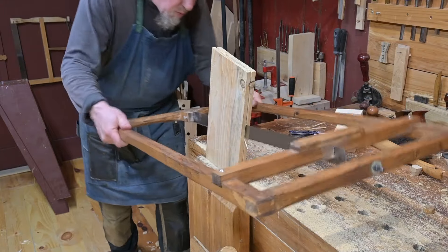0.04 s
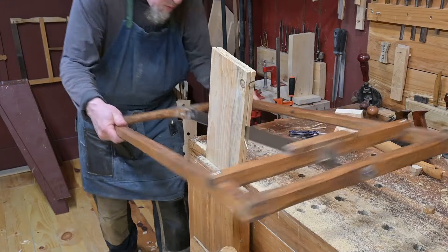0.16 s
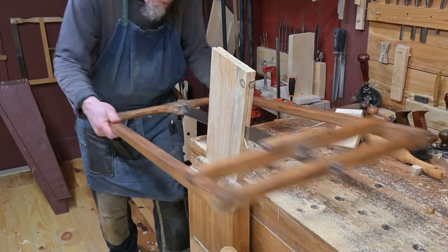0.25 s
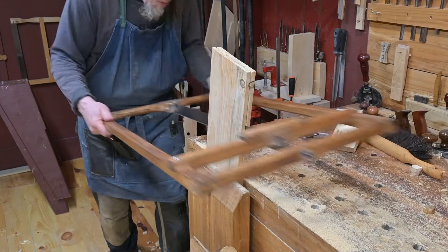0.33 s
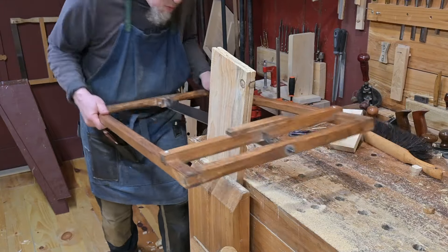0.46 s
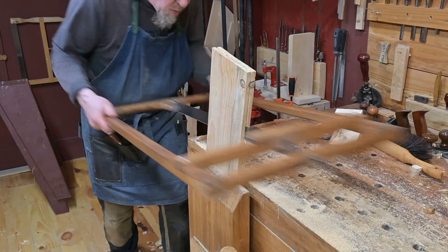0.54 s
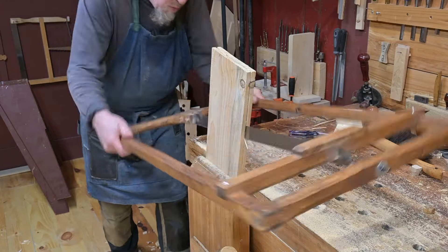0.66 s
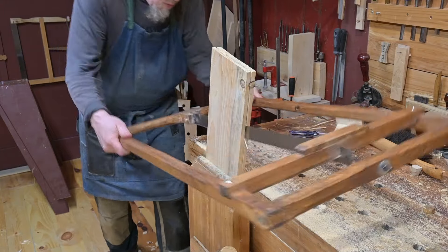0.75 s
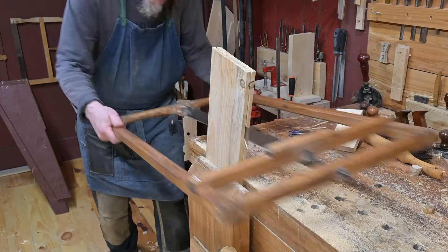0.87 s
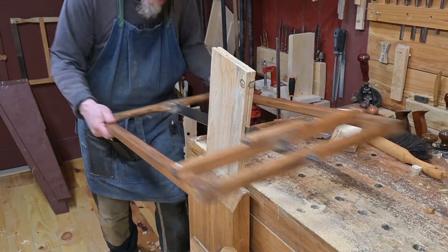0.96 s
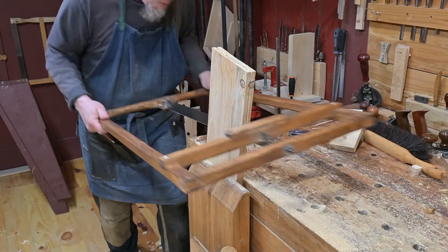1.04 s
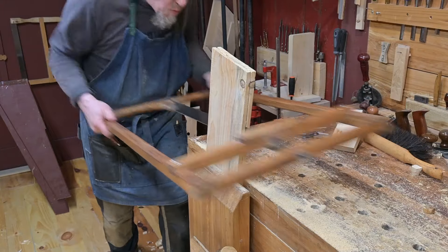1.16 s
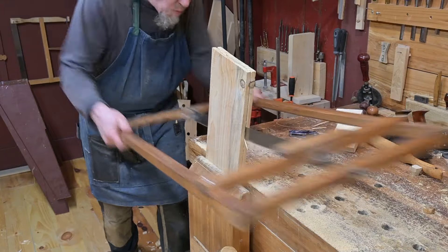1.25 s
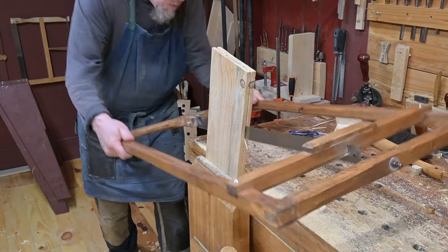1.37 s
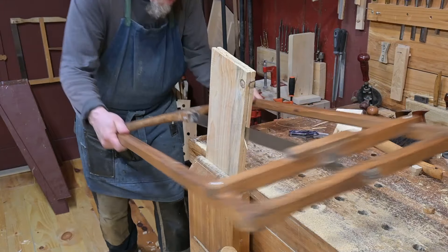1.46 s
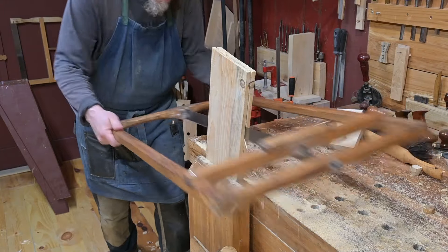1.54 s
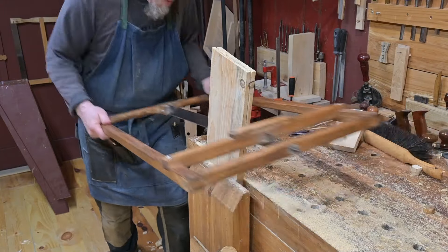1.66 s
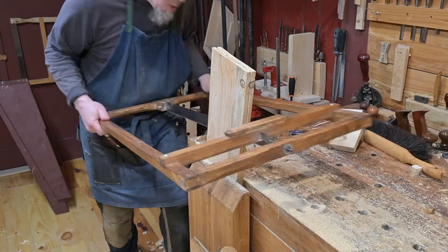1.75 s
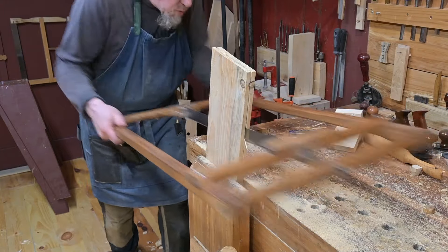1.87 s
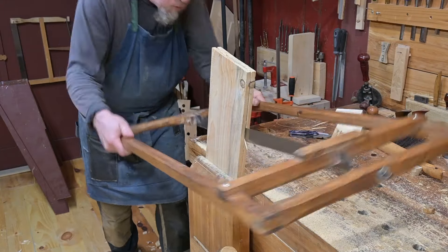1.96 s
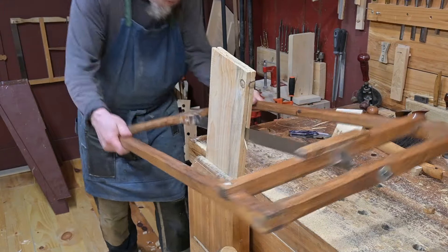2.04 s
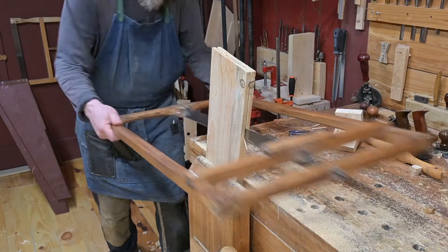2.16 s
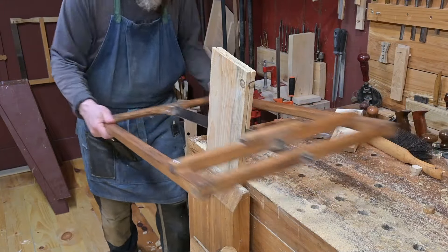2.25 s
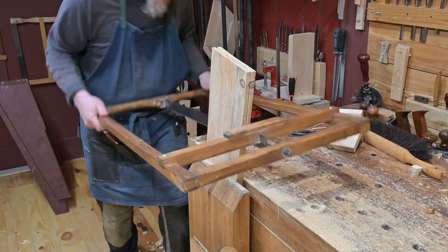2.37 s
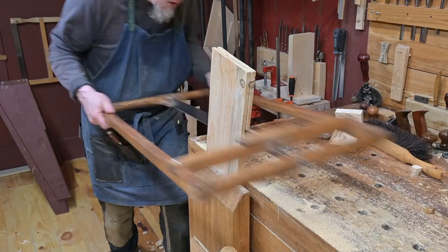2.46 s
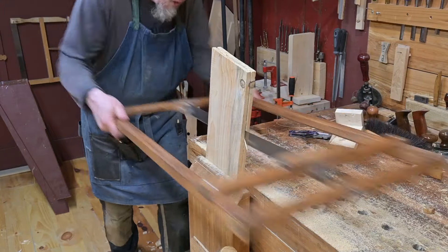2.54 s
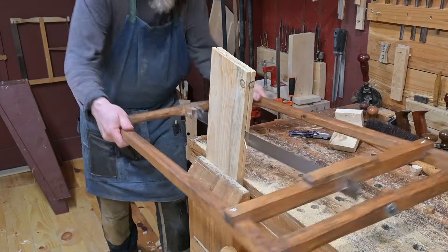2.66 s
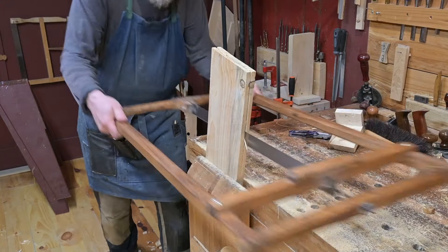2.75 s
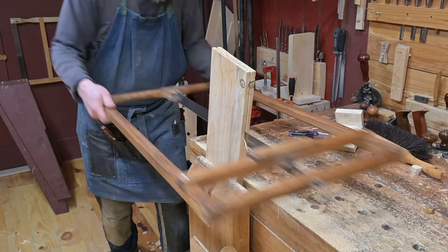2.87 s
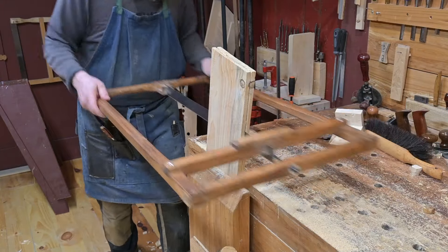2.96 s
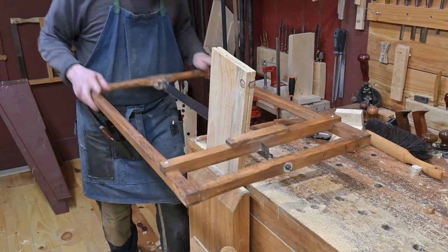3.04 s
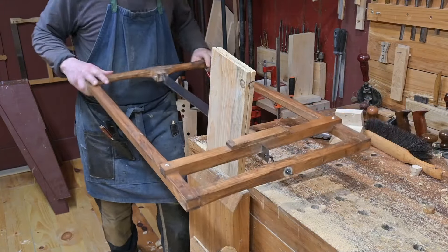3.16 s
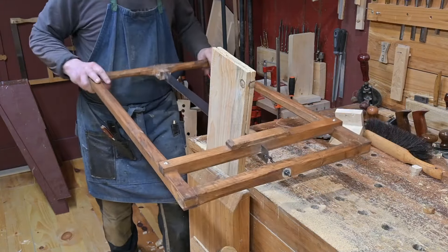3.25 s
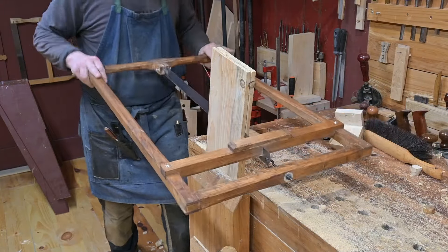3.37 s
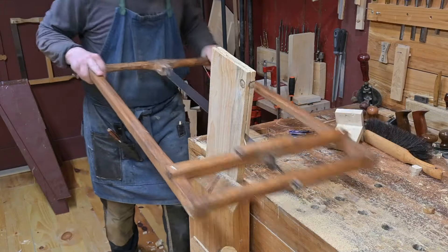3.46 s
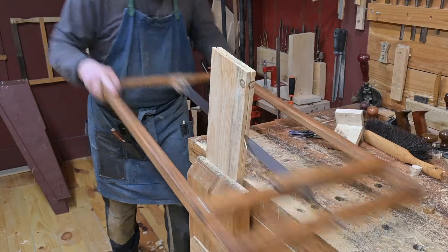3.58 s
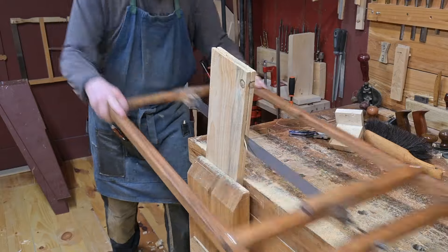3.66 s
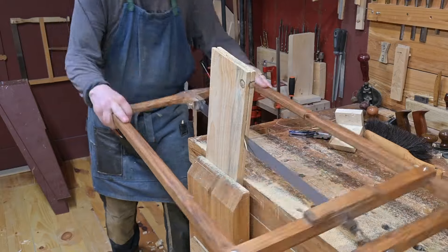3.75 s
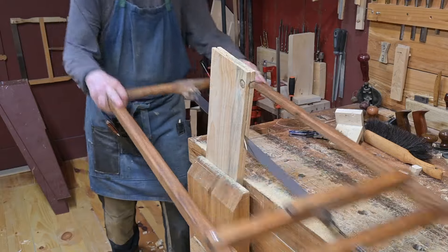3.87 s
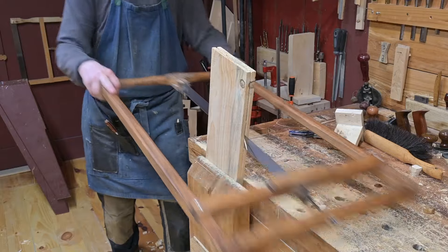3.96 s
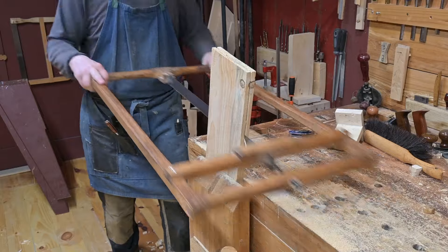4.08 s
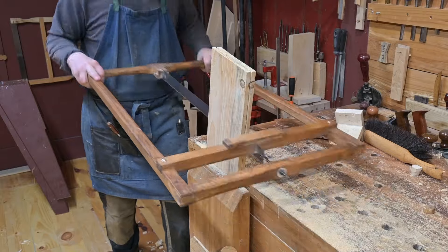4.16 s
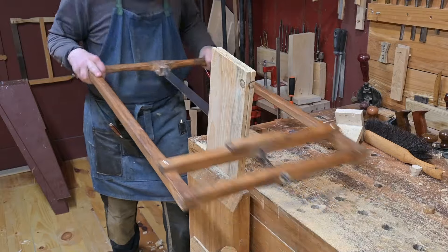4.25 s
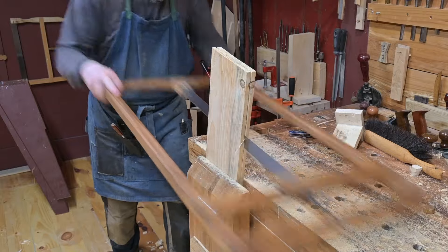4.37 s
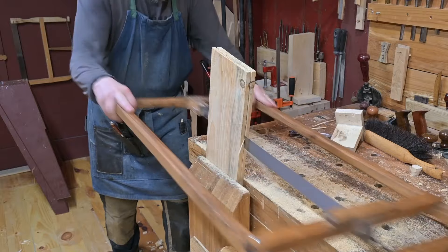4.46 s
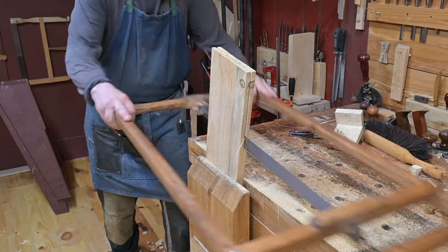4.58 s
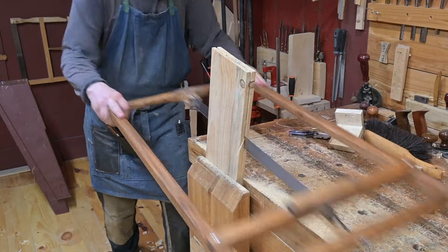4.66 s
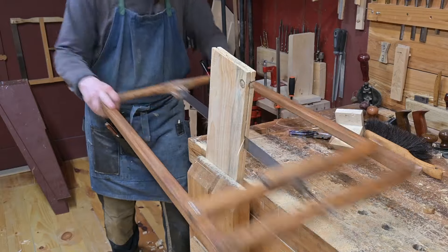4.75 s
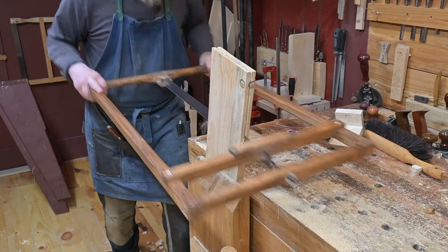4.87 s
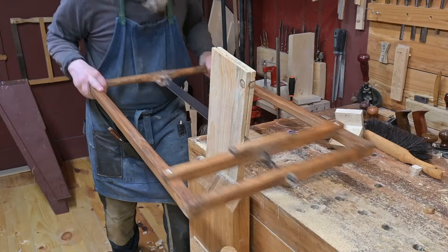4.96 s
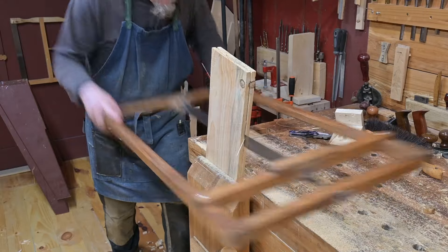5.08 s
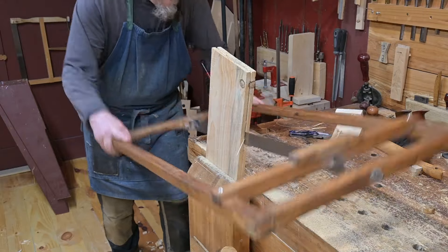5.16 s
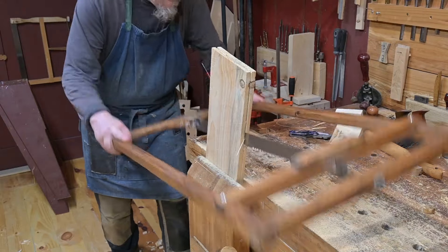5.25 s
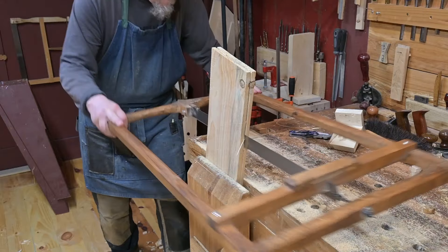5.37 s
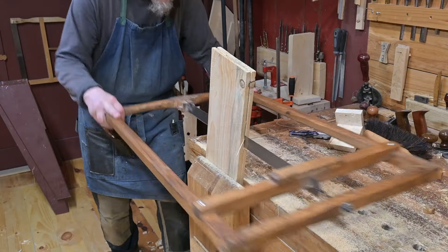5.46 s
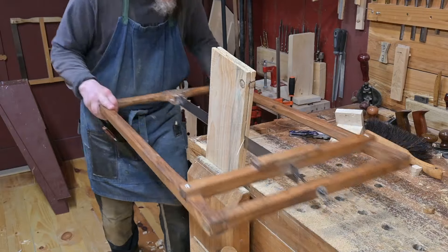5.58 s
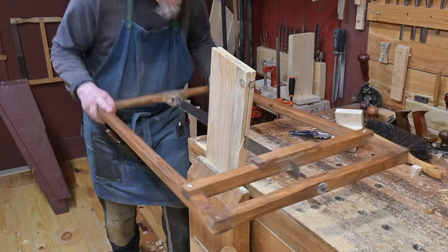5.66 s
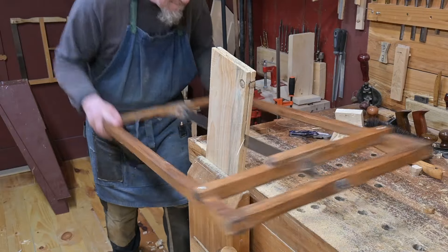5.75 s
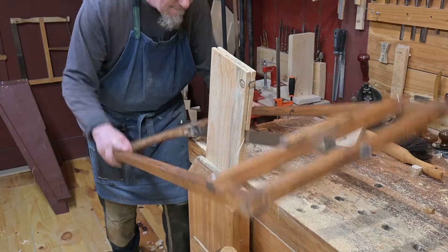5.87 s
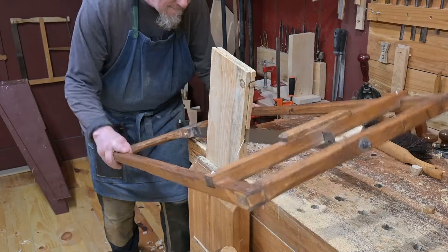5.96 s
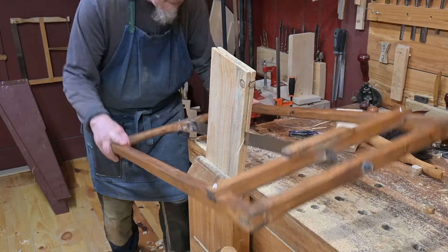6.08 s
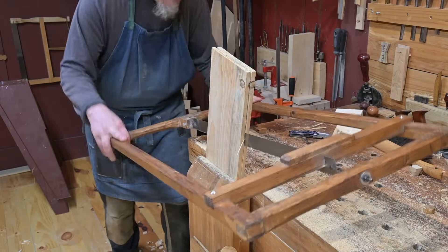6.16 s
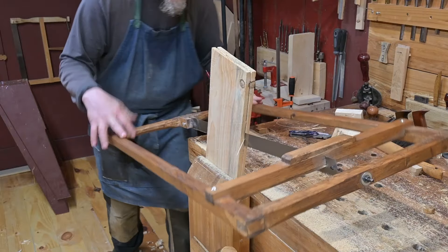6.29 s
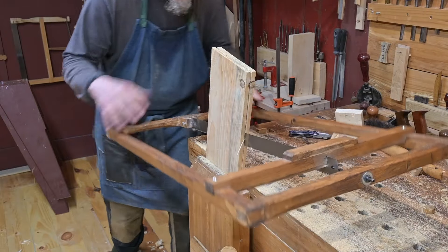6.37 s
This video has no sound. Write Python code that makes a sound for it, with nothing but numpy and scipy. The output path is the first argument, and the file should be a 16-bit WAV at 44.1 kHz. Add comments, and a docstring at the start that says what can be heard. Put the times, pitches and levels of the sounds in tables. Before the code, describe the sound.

A large hand saw cuts through a clamped wooden board in a steady rhythm, each rasping push followed by a scraping pull. The board rings with a woody hum, and the blade sometimes sings faintly. About halfway the sawing halts briefly, then restarts with a juddering stroke. A sharp tick comes near the end, and the strokes stop. It is heard close by in a small workshop.

```python
"""A small woodworking shop: a big frame saw rips a board held upright in a bench vise, with one short halt.
The teeth tear fibres on each push and skate back on each pull. Their blows ring the board and now
and then fall into a regular judder. The taut blade sings under a hard push; the frame ticks at rest.
Heard in mono from close by, over a short room reverberation and faint still air."""
import sys
import numpy as np
from scipy import signal
from scipy.fft import rfft, irfft, next_fast_len
from scipy.io import wavfile
from scipy.ndimage import map_coordinates

SR = 44100
rng = np.random.default_rng(int(sys.argv[2]) if len(sys.argv) > 2 else 0)


def dump_mix(stems):
    """Bounce the given channels to the path in sys.argv[1] as a 16-bit WAV at rate SR."""
    frames = np.atleast_2d(stems).T  # one column per channel
    limited = np.clip(frames, -1, 1)  # hard clip at full scale
    pcm = np.round(limited * 32767).astype(np.int16)
    wavfile.write(sys.argv[1], SR, pcm)


N = 283122
TIME_S = np.arange(N) / SR


def amp(db):
    """Decibels to gain."""
    return 10 ** (np.asarray(db) / 20)


def unit_rms(x):
    """x at rms 1."""
    return x / np.sqrt(np.mean(x ** 2) + 1e-20)


def log_interp(points, hz):
    """(freq_hz, value) points interpolated on a log axis."""
    point_hz, values = np.transpose(points)
    return np.interp(np.log(hz + 1), np.log(point_hz + 1), values)


def wobble(knots_per_s):
    """Smooth random curve."""
    knots = rng.standard_normal(int(N * knots_per_s / SR) + 4)
    return map_coordinates(knots, [TIME_S * knots_per_s])


def filtered(x, response):
    """x through a complex frequency response."""
    size = next_fast_len(N + SR // 2)
    return irfft(rfft(x, size) * response(np.fft.rfftfreq(size, 1 / SR)), size)[:N]


def coloured(x, spectrum):
    """x shaped by a spectrum, at rms 1."""
    return unit_rms(filtered(x, lambda hz: amp(log_interp(spectrum, hz))))


def resonance(hz, centre_hz, width_hz):
    """Response of one damped mode."""
    return 1j * hz * width_hz / (centre_hz ** 2 - hz * hz + 1j * hz * width_hz)


def tone(hz, db, start_s, end_s, waver, flutter_db):
    """Unsteady partial, gated with 10 ms ramps."""
    gate = np.clip(np.minimum(TIME_S - start_s, end_s - TIME_S) / .01, 0, 1)
    cycles = np.cumsum(hz * (1 + waver * wobble(160))) / SR
    flutter = amp(flutter_db * wobble(90))
    return gate * amp(db) * unit_rms(np.sin(2 * np.pi * cycles) * flutter)


def glides(rows, waver, flutter_db):
    """Short unsteady tones that swell and fade as their pitch glides."""
    out = np.zeros(N)
    drift = 1 + waver * wobble(160)
    swing_db = flutter_db * wobble(90)
    for start_s, length_s, first_hz, last_hz, level_db in rows:
        near = (TIME_S > start_s) & (TIME_S < start_s + length_s)
        progress = (TIME_S[near] - start_s) / length_s
        hz = (first_hz + (last_hz - first_hz) * progress) * drift[near]
        swell = np.sin(np.pi * progress) ** 0.66
        out[near] += amp(level_db + swing_db[near]) * swell * np.sin(2 * np.pi * np.cumsum(hz) / SR)
    return out


# Room noise spectrum: freq_hz, relative_db
AIR_SPECTRUM = [(25, -25.5), (70, -5), (350, -5), (800, -8), (2500, -7), (6000, -16), (16000, -22)]


def still_air(level_db=-75):
    """Faint steady noise of the room."""
    return amp(level_db) * coloured(rng.standard_normal(N), AIR_SPECTRUM)


# Room decay: freq_hz, t60_s
SHOP_DECAY = [(150, 0.39), (400, 0.5), (2000, 0.31), (5000, 0.34), (9000, 0.58), (15000, 0.1)]


def shop_reverb(x, level_db=-8.5, treble_cut_hz=8000, positions=20):
    """Reflections change as saw and sawyer move; the reverberation is duller in the treble."""
    out = np.zeros(N)
    position = np.linspace(0, positions - 1, N)
    for k in range(positions):
        hz, age_s, noise = signal.stft(rng.standard_normal(SR * 3 // 4), SR, nperseg=256)
        decay = amp(-60 * age_s / log_interp(SHOP_DECAY, hz)[:, None])
        tail = signal.istft(noise * decay, SR, nperseg=256)[1]
        crossfade = np.sqrt(np.maximum(1 - np.abs(position - k), 0))
        out += signal.oaconvolve(x * crossfade, tail / np.linalg.norm(tail))[:N]
    return amp(level_db) * filtered(out, lambda hz: 1 / (1 + (hz / treble_cut_hz) ** 2))


# Frame and blade ticks: start_s, peak_db, pitch_hz, width_hz
FRAME_TICKS = [(5.336, -24.5, 4120, 6000), (5.356, -34, 6000, 7000), (6.266, -64, 2900, 1505),
               (6.335, -58, 2420, 1500), (6.36, -65, 2290, 1500)]


def frame_ticks(t60_s=0.018):
    """Slack in the frame closes with a short dry tick."""
    out = np.zeros(N)
    for start_s, peak_db, pitch_hz, width_hz in FRAME_TICKS:
        age_s = TIME_S - start_s
        burst = rng.standard_normal(N) * (age_s >= 0) * amp(-60 * np.abs(age_s) / t60_s)
        tick = filtered(burst, lambda hz: resonance(hz, pitch_hz, width_hz) ** 2)
        out += amp(peak_db) * tick / np.abs(tick).max()
    return out


# Blade tones: start_s, length_s, first_hz, last_hz, level_db
BLADE_TONES = [(.56, .09, 1750, 1760, -44), (1.25, 0.076, 1795, 1810, -38), (1.87, 0.12, 1810, 1795, -39.5),
               (2.53, 0.063, 1880, 1890, -37), (4.34, 0.1, 1886, 1847, -34)]


def blade_singing():
    """Taut steel rings briefly when the teeth drive it hard."""
    return glides(BLADE_TONES, waver=0.0079, flutter_db=3.0)


# Blade binding: time_s, tooth_rate_hz, fundamental_relative_db, octave_relative_db
BIND_CURVE = [(3.549, 254.4, -54, -59), (3.59, 247.5, -35.5, -41), (3.633, 236.4, -34, -34),
              (3.665, 226.4, -39, -45), (3.71, 221, -66, -43.5), (3.74, 236.8, -57, -40.5),
              (3.81, 201, -59.5, -45)]
# Teeth in step: start_s, length_s, first_hz, last_hz, level_db
TOOTH_HUMS = [(-.04, .14, 327, 303, -41), (.55, 0.085, 308, 365, -35), (.62, 0.106, 484, 415, -43),
              (.88, 0.078, 312, 340, -39.5), (1.201, 0.11, 415.3, 403, -34.5),
              (1.45, 0.057, 337.2, 298, -36), (1.91, 0.1, 425, 418, -37), (2.11, 0.094, 320, 336.6, -41.5),
              (2.438, 0.086, 234, 294.5, -34), (2.721, 0.14, 312, 352, -34.5),
              (2.821, 0.086, 271.9, 270, -37), (2.87, .11, 227.1, 211.1, -41.5),
              (3.86, 0.084, 318, 364, -32.5), (3.905, .18, 559.5, 644, -35.5),
              (4.332, 0.1, 277.4, 346.4, -35.5), (4.426, 0.059, 370.7, 327.6, -32),
              (4.655, 0.061, 325, 365, -29), (4.703, .11, 413, 443.5, -31),
              (4.81, 0.081, 360.3, 312, -33.5), (4.973, 0.074, 312.4, 332, -35),
              (5.031, .14, 251.1, 302.6, -36), (5.54, .07, 316.1, 338, -36)]


def judder(bind_gain_db=4.5):
    """Teeth catch in step and swing the board at the tooth rate."""
    time_s, *columns = np.transpose(BIND_CURVE)
    hz, fundamental_db, octave_db = (np.interp(TIME_S, time_s, column) for column in columns)
    span_s = time_s[0], time_s[-1]
    fundamental = tone(hz, fundamental_db, *span_s, waver=0.014, flutter_db=4.0)
    octave = tone(2 * hz, octave_db - 0.5, *span_s, waver=0.02406, flutter_db=2.5)
    hums = glides(TOOTH_HUMS, waver=0.025, flutter_db=2.5)
    return amp(bind_gain_db) * (fundamental + octave) + hums


# Catches at the start of a push: start_s, level_db
PUSH_JOLTS = [(0.498, -32), (1.14, -37), (1.78, -36), (2.432, -35)]
# Woody thump spectrum: freq_hz, relative_db
JOLT_SPECTRUM = [(60, -24.5), (170, -14), (260, 3), (480, 20), (700, -4.5), (1500, -29), (5000, -46)]


def jolts(force, rise_s=0.0036, t60_s=0.083):
    """The first teeth of a hard push catch abruptly and thump the wood."""
    envelope = np.zeros(N)
    for start_s, level_db in PUSH_JOLTS:
        age_s = np.maximum(TIME_S - start_s, 0)
        envelope += amp(level_db - 60 * age_s / t60_s) * (1 - np.exp(-age_s / rise_s))
    return envelope * coloured(force, JOLT_SPECTRUM)


# Clamped board modes: pitch_hz, width_hz, relative_db
BOARD_MODES = [(245.5, 30, -8), (314.6, 29.5, 4.5), (427.7, 30, -3), (486.8, 9.1, -2), (562, 65, -12.5),
               (711, 20, -5.5), (772, 23, -26), (932, 34, -5), (1157, 46, -19), (1810, 22, -8)]
# Bench thud spectrum: freq_hz, relative_db
BENCH_SPECTRUM = [(25, -57.5), (70, -23), (130, -5.5), (200, 3.5), (300, -1.5), (700, -32)]


def board(force, bass_cut_hz=210, bench_db=-22):
    """The board rings in its modes but radiates little bass; the bench thuds faintly."""
    def response(hz):
        modes = sum((-1) ** k * amp(db) * resonance(hz, pitch_hz, width_hz)
                    for k, (pitch_hz, width_hz, db) in enumerate(BOARD_MODES))
        return modes * (hz / np.hypot(hz, bass_cut_hz)) ** 4

    return unit_rms(filtered(force, response)) + amp(bench_db) * coloured(force, BENCH_SPECTRUM)


def tooth_blows(tooth_phase, scatter_db=8.0):
    """One impulse per tooth entering the wood."""
    entering = np.diff(np.floor(tooth_phase), prepend=0)
    return unit_rms(entering * amp(scatter_db * rng.standard_normal(N)))


def fibre_snaps(tooth_phase, spread_db=1.5, bunching=0.12):
    """Dense uneven snaps of single fibres, bunched where a tooth strikes."""
    snaps = rng.standard_normal(N) * amp(spread_db * rng.standard_normal(N))
    return unit_rms(snaps * np.exp(bunching * np.cos(2 * np.pi * tooth_phase)))


# Rasp spectra of cutting and skating teeth: freq_hz, relative_db
CUT_SPECTRUM = [(100, -62), (250, -10), (600, -3), (1000, -0.5), (1350, -2), (1850, 2), (2250, -0.5),
                (2900, 0), (4300, -2), (5500, -6.5), (8000, -9.5), (10300, -16), (12300, -12.5),
                (16000, -18.5)]
SKATE_SPECTRUM = [(100, -56.5), (280, -27), (600, -5), (1000, 1.5), (1350, -2), (1850, 2), (2300, -1.5),
                  (3700, -1), (5200, -6.5), (7300, -11.5), (8300, -11), (9800, -18), (12700, -15.5),
                  (16000, -19)]


def rasp(tearing, pushing, ring_db, tilt_db, ring_hz=3500, ring_octaves=0.74, tilt_hz=11000):
    """Kerf noise, coloured by the blade's broad ring and a varying treble tilt."""
    kerf = pushing * coloured(tearing, CUT_SPECTRUM) + (1 - pushing) * coloured(tearing, SKATE_SPECTRUM)
    hz, frame_s, spectra = signal.stft(kerf, SR, nperseg=256)
    ring_shape = np.exp(-(np.log2((hz + 1) / ring_hz) / ring_octaves) ** 2) - .5
    colour_db = np.outer(ring_shape, np.interp(frame_s, TIME_S, ring_db))
    colour_db += np.outer(hz / tilt_hz, np.interp(frame_s, TIME_S, tilt_db))
    return signal.istft(spectra * amp(colour_db), SR)[1][:N]


def strokes(rows, pushing, arch_db=2, half_speed_db=10.5):
    """Each stroke rises, holds and falls. Returns summed power and seven power-weighted controls."""
    sums = np.zeros((8, N))
    for full_bite_s, hold_s, bite_db, rise_db_per_s, fall_db_per_s, *timbre_db in rows:
        near = (TIME_S > full_bite_s - 1) & (TIME_S < full_bite_s + hold_s + 1)
        age_s = TIME_S[near] - full_bite_s
        progress = np.clip(age_s / hold_s, 0, 1)
        eased_db = rise_db_per_s * np.maximum(-age_s, 0) + fall_db_per_s * np.maximum(age_s - hold_s, 0)
        arm_db = arch_db * (np.sin(np.pi * progress) - .5)  # the arm bears down hardest mid-hold
        power = amp(bite_db - eased_db + arm_db) ** 2
        speed = .5 ** (eased_db / half_speed_db)
        braking = (1 - speed) * (age_s > hold_s)
        for total, value in zip(sums, (1, speed, braking, progress, pushing, *timbre_db)):
            total[near] += power * value
    return sums


# Cutting pushes and skating pulls (only slight at rest):
# full_bite_s, hold_s, bite_db, rise_db_per_s, fall_db_per_s, board_db, ring_db, treble_db
PUSH_STROKES = [(-.097, 0.11, -30.5, 350, 156.5, 1.5, -1.5, 0.5),
                (.513, 0.13, -29.5, 410, 153.5, 0.5, -0.5, 1),
                (1.155, 0.14, -28.5, 410.5, 173, -1, 1.5, 0.5), (1.793, 0.15, -29, 410, 163, -0.5, 1.5, 1),
                (2.443, .15, -30, 410, 174, 2, 1, 1.5), (3.476, 0.17, -31, 330, 113.5, 1, -2, -0.5),
                (4.292, .162, -29, 313, 184, -0.5, 1.5, 2.5), (4.996, .14, -29, 394.5, 137, 0.5, 0.5, 1.5),
                (5.716, 0.098, -31, 360, 128.5, -1.5, 1.5, 1)]
PULL_STROKES = [(.269, 0.14, -31.5, 107.7, 225.6, -4, .5, 0.65),
                (.895, 0.15, -31.5, 105.6, 189.8, -2.5, .5, -0.065),
                (1.53, 0.17, -31.5, 124.8, 213.6, -2.5, 1.1, 0.87),
                (2.174, 0.16, -31, 96.93, 208.5, -1, 1.17, 0.17),
                (2.781, 0.21, -32.5, 128.8, 215.1, -1, -1.2, -0.52),
                (3.09, 0.036, -54, 250.5, 219.6, -7.5, 0, -0.5),
                (3.317, .022, -57.5, 211.1, 244.8, -6.5, 1.5, -0.18),
                (3.907, 0.25, -31.5, 154.7, 193, 0.5, .5, 0.57),
                (4.668, 0.22, -31.5, 118.9, 203.4, 1.5, -0.35, -0.19),
                (5.465, .14, -37, 74.05, 215.5, -3.5, -1.1, -0.33),
                (6.19, 0.33, -75.5, 199.7, 200, -14.5, 1.07, -2.2)]


def sawing(tooth_rate_hz=480.6, stall_db=-12, clog_db=-1, light_bite_db=-43, board_gain_db=3.5):
    """Tearing fibres rasp in the kerf while the teeth shake the board."""
    power, *weighted = strokes(PUSH_STROKES, pushing=True) + strokes(PULL_STROKES, pushing=False)
    speed, braking, progress, pushing, board_db, ring_db, treble_db = weighted / power
    bite_db = 10 * np.log10(power)
    unevenness = np.exp(.14 * wobble(140))  # hand-filed teeth in uneven grain
    tooth_phase = np.cumsum(tooth_rate_hz * speed * unevenness) / SR
    tearing = fibre_snaps(tooth_phase)
    # a slowing blade and gullets filling with sawdust both dull the rasp
    tilt_db = treble_db + stall_db * braking + clog_db * (progress - .5)
    grain_db = 0.78 * wobble(70)
    kerf = amp(bite_db + grain_db) * rasp(tearing, pushing, ring_db, tilt_db)
    # even a light bite shakes the board almost fully
    shake = amp(board_gain_db + board_db + bite_db) / np.hypot(1, amp(bite_db - light_bite_db))
    force = tooth_blows(tooth_phase) + tearing
    return kerf + shake * board(force) + jolts(force)


def scene():
    """Saw, reverberation and still air, alike in both channels."""
    saw = sawing() + judder() + blade_singing() + frame_ticks()
    mono = saw + shop_reverb(saw) + still_air()
    return np.array([mono, mono])


def record(dry, cutoff_hz=15850):
    """Brick-wall low-pass."""
    return np.array([filtered(channel, lambda hz: hz < cutoff_hz) for channel in dry])


dry = scene()
out = record(dry)
dump_mix(out)
```